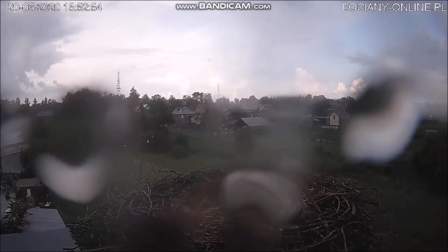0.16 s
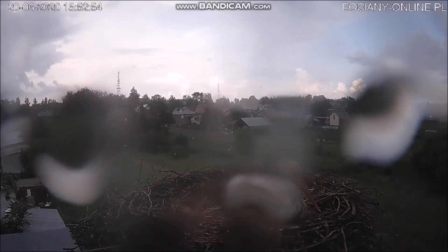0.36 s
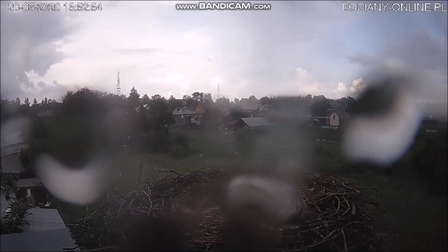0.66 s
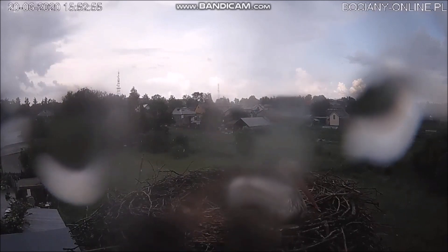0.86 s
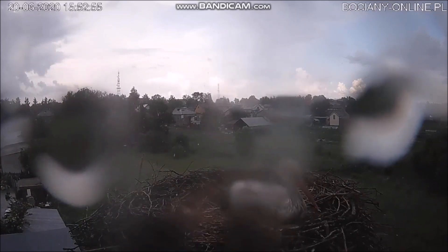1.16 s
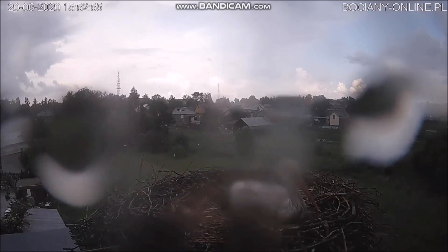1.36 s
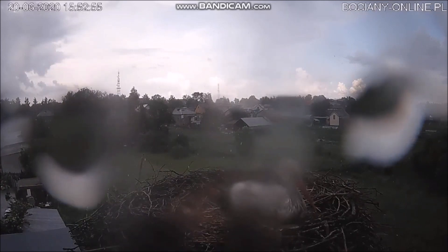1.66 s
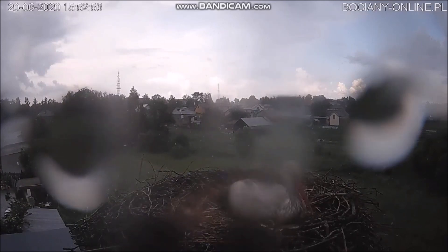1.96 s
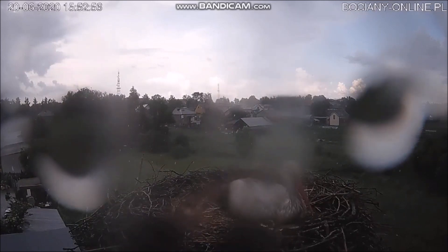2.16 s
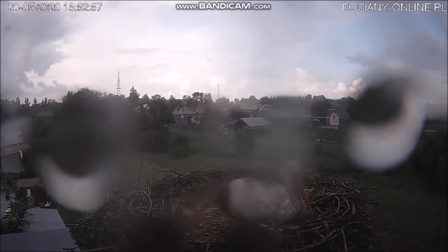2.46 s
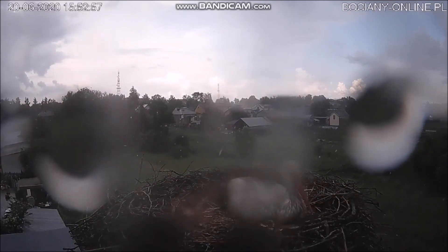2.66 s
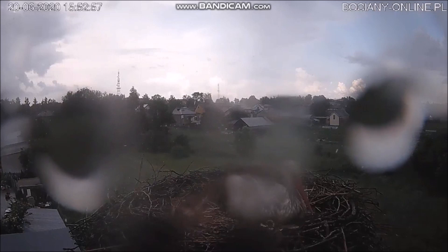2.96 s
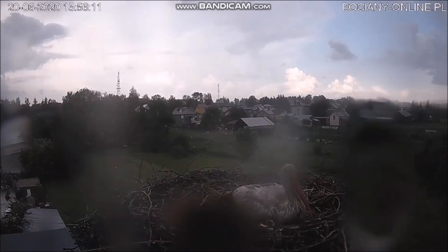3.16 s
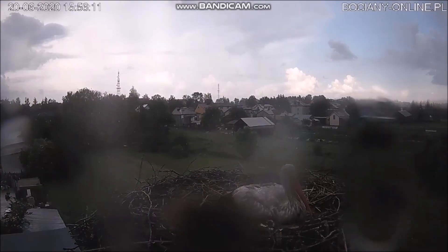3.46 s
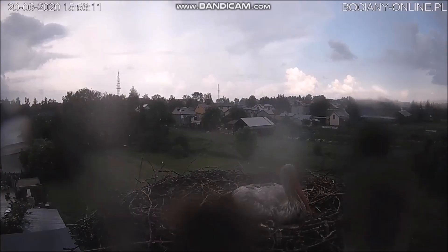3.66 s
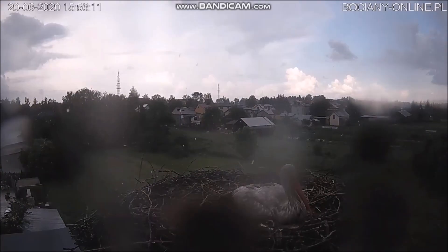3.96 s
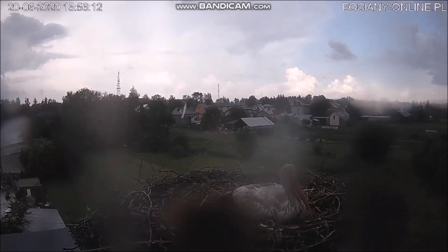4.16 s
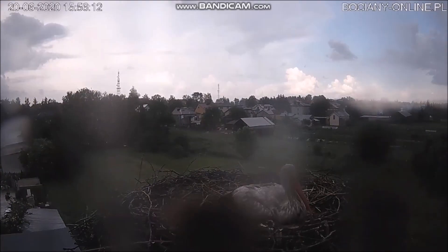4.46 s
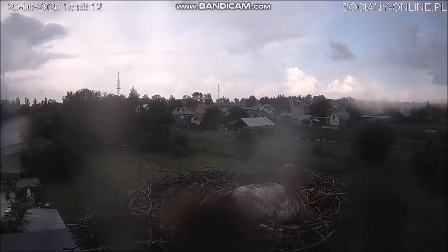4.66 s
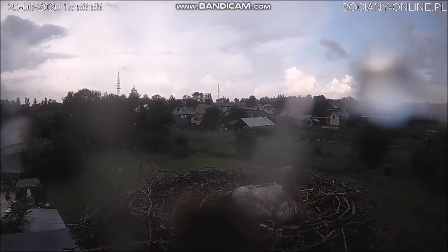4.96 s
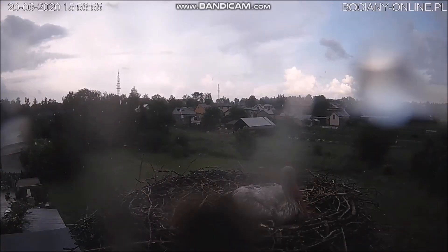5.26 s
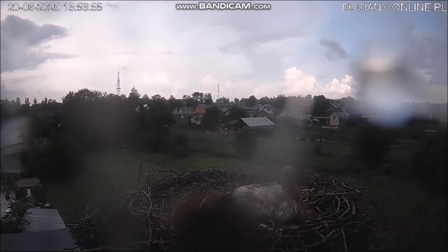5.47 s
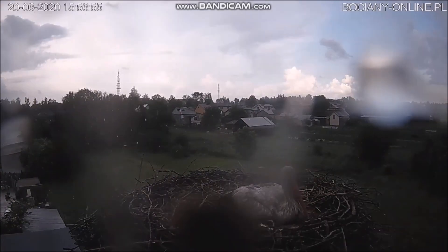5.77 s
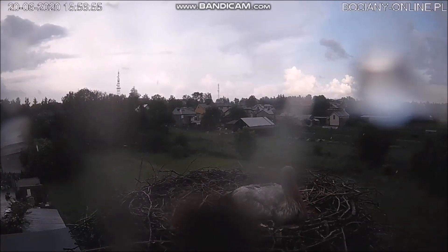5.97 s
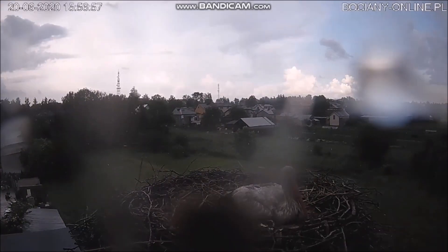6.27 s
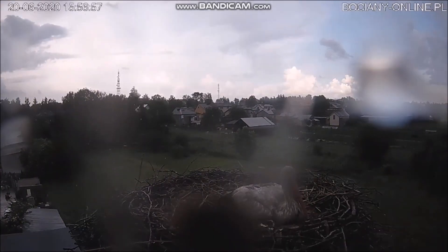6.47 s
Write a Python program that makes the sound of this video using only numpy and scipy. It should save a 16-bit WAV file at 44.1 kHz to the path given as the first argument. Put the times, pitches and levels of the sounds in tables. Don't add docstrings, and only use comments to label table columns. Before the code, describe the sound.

Outdoors at a stick nest, one mono microphone in a plastic housing catches dense bright rain, with near drops splashing, ticking and knocking. Muffled thunder rolls far off and fades. The sound drops to total silence for an instant, returns with softer rain, then cuts abruptly into a near thunder stroke: a rip, a violent crack, booming, crackling peals and late claps.

```python
import sys
import numpy as np
from scipy import signal
from scipy.fft import rfft, irfft
from scipy.io import wavfile
from scipy.ndimage import uniform_filter1d

SR = 44100
rng = np.random.default_rng(int(sys.argv[2]) if len(sys.argv) > 2 else 0)


def to_wav(s):
    ch = np.atleast_2d(s).T
    pcm = np.round(np.clip(ch, -1, 1) * 32767)
    wavfile.write(sys.argv[1], SR, pcm.astype(np.int16))


def invert_db(x):
    u = np.asarray(x, float) / 20
    return 10 ** u


N = 291501

GAP_S = (3.1335, 3.2002)
JUMP_S = 4.8665
RAIN_DB = (-43.2, -50.6, -48.3)


def unit(x):
    return x / np.sqrt(np.mean(x ** 2))


def colour(x, points, size=4096):
    hz, db = np.transpose(points)
    grid = np.maximum(np.arange(size // 2 + 1) * SR / size, 1)
    log_gain = np.interp(np.log(grid), np.log(hz), db) * np.log(10) / 20
    cepstrum = irfft(log_gain)
    cepstrum[1:size // 2] *= 2
    cepstrum[size // 2 + 1:] = 0
    impulse = irfft(np.exp(rfft(cepstrum)))
    return unit(signal.fftconvolve(x, impulse)[:N])


def walk(rate):
    hold = int(SR / rate)
    steps = np.repeat(rng.standard_normal(N // hold + 1), hold)
    return unit(uniform_filter1d(uniform_filter1d(steps, hold), hold)[:N])


def grains(rate, spread_db, smear_s, share):
    hit = rng.random(N) < rate / SR
    size = invert_db(spread_db * np.minimum(rng.exponential(size=N), 3.5))
    t = np.arange(int(0.05 * SR)) / SR
    energy = signal.fftconvolve(hit * size ** 2, np.exp(-2 * t / smear_s))[:N]
    energy = np.maximum(energy / energy.mean(), 0)
    return np.sqrt(1 - share + share * energy) * rng.standard_normal(N)


def add(out, s, sound):
    i = int(s * SR)
    out[i:i + len(sound)] += sound[:N - i]


def burst(x, lo_hz, hi_hz):
    y = signal.lfilter(*signal.butter(2, [lo_hz, hi_hz], "band", fs=SR), x)
    return y / np.abs(y).max()


def stretch(values):
    t = np.arange(N) / SR
    part = (t > GAP_S[1]) * 1 + (t >= JUMP_S)
    return np.array(values)[np.minimum(part, len(values) - 1)]


def swells(rows):
    t = np.arange(N) / SR
    power = sum(invert_db(db - 20 * np.maximum((s - t) / rise, (t - s) / fade)) ** 2 for s, db, rise, fade in rows)
    return 10 * np.log10(power + 1e-12)


def rain():
    # frequency in Hz, level in dB per Hz.
    heavy_colour = [(290, -31.5), (500, -15), (553, -15.5), (855, -10), (1440, 0.9), (2930, -4),
                    (3600, -0.5), (4470, -7), (5470, -6.7), (7100, -15), (8090, -11.5), (10100, -18),
                    (13400, -24.5), (15100, -32), (16000, -37.5)]
    # frequency in Hz, level in dB per Hz.
    light_colour = [(290, -21), (500, -23), (688, -21), (750, -18), (930, -6.5), (1110, -2), (1250, 1),
                    (1550, 0.3), (2570, -1), (3490, -1.5), (5470, -5.5), (7100, -14.5), (8090, -12.5),
                    (10000, -16), (11300, -20.5), (12700, -22), (16000, -30)]
    # peak time in seconds, dB against the steady rain,
    # seconds to rise 20 dB, seconds to fade 20 dB.
    gusts = [
        (0.0, -1, 0.1, 0.1),
        (0.5, -5, 0.4, 0.3),
        (1.0, -6, 0.5, 0.3),
        (1.75, -6, 0.6, 0.5),
        (4.0, -6, 0.5, 0.4),
        (4.6, -4, 0.6, 0.8),
    ]
    low = signal.butter(2, 4000, fs=SR, output="sos")
    high = signal.butter(2, 4000, "high", fs=SR, output="sos")
    dull = invert_db(0.5 * walk(9.03)) * grains(1600, 3.1, 0.002, 0.25)
    bright = invert_db(0.88 * walk(14)) * grains(600, 4.04, 0.0017, 0.273)
    patter = signal.sosfilt(low, dull) - signal.sosfilt(high, bright)
    heavy = np.arange(N) < GAP_S[1] * SR
    coloured = invert_db(4) * np.where(heavy, colour(patter, heavy_colour), colour(patter, light_colour))
    return coloured * invert_db(stretch(RAIN_DB)) * np.hypot(1, invert_db(swells(gusts)))


def contact(t60_s=0.0066):
    t = np.arange(int(0.03 * SR)) / SR
    attack = 1 - np.exp(-t / 0.00035)
    blow = rng.standard_normal(len(t)) * attack * np.exp(-np.log(1000) * t / t60_s)
    blow[4] += 1.8
    return blow


def splash(blow, db, ring_hz, edge_db):
    broad = burst(burst(blow, 2200, 7870), 2200, 7870)
    ring = burst(blow, 0.704 * ring_hz, 1.174 * ring_hz)
    edge = burst(blow, 8400, 14600)
    return invert_db(db) * (0.656 * broad + 0.663 * ring) - invert_db(edge_db) * edge


def drops():
    # start in seconds, splash peak in dB, ring in Hz, edge peak in dB.
    near_drops = [(0.0885, -28.5, 5230, -29.5), (0.1125, -25.5, 4900, -48), (0.2187, -26, 5860, -37.5),
                  (0.2288, -31, 6200, -34), (0.2321, -11, 6920, -17), (0.5646, -30, 5540, -28),
                  (0.5683, -21, 3300, -28), (0.7893, -34, 4820, -38), (0.8343, -33, 3790, -49),
                  (0.845, -28.5, 5170, -45), (0.961, -32.5, 5510, -35.5), (1.1365, -35, 4480, -37),
                  (1.2076, -32, 5510, -40), (1.297, -24.5, 6550, -36.5), (1.6035, -29, 4480, -51),
                  (2.438, -24, 4130, -43), (2.5199, -32.5, 4820, -37), (2.7697, -20, 4210, -24.5),
                  (2.924, -25.5, 4560, -25), (3.0822, -28.5, 6200, -39.5), (3.332, -28.5, 4430, -51),
                  (3.8313, -36, 4820, -51), (4.595, -34, 5170, -49), (4.687, -37, 6500, -44),
                  (5.6098, -34.5, 4100, -41), (5.8961, -27, 8600, -51.5), (5.9756, -29.5, 4900, -46),
                  (6.1888, -30, 4900, -35), (6.3457, -31, 5660, -55), (6.4563, -29.5, 8500, -55)]
    # start in seconds, edge peak in dB.
    spray = [(0.496, -38.5), (0.6843, -41.5), (1.3658, -39), (2.295, -35), (3.4943, -40.5), (4.23, -47),
             (4.7992, -47), (5.0334, -38.5), (5.6671, -37.5), (6.0391, -44.5), (6.2959, -44.5)]
    out = np.zeros(N)
    for s, db, hz, edge_db in near_drops:
        add(out, s, splash(contact(), db, hz, edge_db))
    for s, edge_db in spray:
        add(out, s, splash(contact(), edge_db - 4.5, 6000, edge_db))
    return out


def thuds():
    # start in seconds, peak in dB, pitch in Hz.
    knocks = [(0.2325, -19.5, 1900), (0.566, -27, 1600), (0.5691, -23, 2100), (1.293, -30, 1550),
              (1.297, -31.5, 1550), (2.438, -37, 1550), (2.7697, -24, 2300), (2.7724, -22, 1600),
              (2.9208, -24, 3300), (2.9235, -22, 1600), (0.938, -30, 2200), (0.992, -28, 3500),
              (1.03, -32, 4200), (2.359, -30, 3700), (3.108, -31, 4500), (4.15, -38, 6000),
              (4.545, -42, 8500), (4.6155, -34, 5200), (4.69, -38, 6000), (4.7205, -33, 3500),
              (4.752, -42, 8000), (6.1888, -17.5, 4500), (2.9245, -31, 800), (0.153, -32, 900),
              (1.72, -30, 3600), (1.8, -30, 3500), (1.86, -31, 3700)]
    out = np.zeros(N)
    for s, db, hz in knocks:
        body = burst(burst(contact(), 0.7 * hz, 1.4 * hz), 0.7 * hz, 1.4 * hz)
        add(out, s, -invert_db(db) * body)
    return out


def ticks(count=160):
    out, t, rain_db = np.zeros(N), np.arange(int(0.01 * SR)) / SR, stretch(RAIN_DB)
    for when, pitch, size in rng.random((count, 3)):
        hz = 2500 * 4.2 ** pitch
        ring = np.sin(2 * np.pi * hz * t) * np.exp(-t * hz / 5.2)
        db = rain_db[int(when * (N - 1))] + 2 + 10.94 * size - 7 * pitch
        add(out, when * (N - 1) / SR, invert_db(db) * ring)
    return out


def bubbles():
    # start in seconds, peak in dB, first pitch in Hz, last pitch in Hz, length in seconds.
    cavities = [
        (0.155, -37.5, 900, 2050, 0.018),
        (0.232, -35, 950, 1300, 0.012),
        (1.66, -42, 3500, 3350, 0.01),
        (1.692, -42, 3300, 3400, 0.01),
        (1.727, -39, 3450, 3350, 0.016),
        (1.772, -41, 3600, 3400, 0.02),
        (1.862, -39, 3300, 3600, 0.022),
        (4.687, -42, 4800, 5200, 0.01),
    ]
    out = np.zeros(N)
    for s, db, from_hz, to_hz, length in cavities:
        u = np.arange(int(length * SR)) / (length * SR)
        phase = 2 * np.pi * np.cumsum(from_hz + (to_hz - from_hz) * u) / SR
        add(out, s, invert_db(db) * np.sin(np.pi * u ** 0.7) * np.sin(phase))
    return out


def stroke(axis):
    # start in seconds, crackle in dB, boom in dB, seconds to fade 20 dB.
    claps = [
        (4.867, -32.5, -38, 0.28),
        (5.064, -21.5, -24, 0.075),
        (5.131, -23.5, -28.5, 0.14),
        (5.147, -23.5, -25, 0.115),
        (5.55, -52, -42, 0.05),
        (6.056, -35, -44, 0.07),
        (6.197, -35, -38.5, 0.13),
        (6.269, -31.5, -41, 0.07),
        (6.587, -33.5, -38, 0.2),
    ]
    # peak time in seconds, crackle in dB, boom in dB,
    # seconds per 20 dB.
    peals = [
        (5.035, -30.5, -40, 0.13),
        (5.34, -34.5, -37, 0.25),
        (5.655, -34, -46, 0.24),
        (5.6, -36, -50, 0.07),
        (5.69, -36, -48, 0.05),
        (5.78, -46, -44, 0.1),
        (5.895, -39, -52, 0.05),
        (5.968, -36, -44.5, 0.11),
        (6.54, -42, -46, 0.2),
    ]
    # peak time in seconds, crackle in dB, boom in dB, seconds to fade 20 dB.
    echo_tail = (5.1, -36, -44, 3.7)
    arrivals = [(row[0], row[axis], 0.0042, row[3]) for row in claps]
    arrivals += [(echo_tail[0], echo_tail[axis], 0.25, echo_tail[3])]
    arrivals += [(row[0], row[axis], row[3], row[3]) for row in peals]
    return swells(arrivals)


def cracks():
    # start in seconds, peak in dB.
    crack_edges = [
        (5.0632, -16),
        (5.0715, -30.5),
        (5.0793, -24),
        (5.131, -26),
        (5.1372, -22.5),
        (5.1393, -19.5),
        (5.1426, -32),
        (5.1504, -17.5),
        (5.159, -23.5),
        (5.1753, -31.5),
    ]
    out = np.zeros(N)
    for s, db in crack_edges:
        add(out, s, splash(contact(t60_s=0.0095), db, 2800, db - 12))
    return out


def shocks():
    # start in seconds, peak in dB, length in ms.
    far_fronts = [(0.1502, -24, 2.95), (0.1864, -27, 3.07), (0.2274, -35, 3.59), (0.3304, -37, 2.36),
                  (0.3881, -36, 2.95), (0.4171, -38, 2.88), (0.4331, -36, 2.72), (0.4957, -37, 2.75),
                  (0.5654, -32, 2.22), (0.7347, -40, 2.73), (1.3429, -34, 3.16), (1.3652, -36, 3.45),
                  (1.407, -36, 2.47), (1.4863, -35, 2.74), (1.4993, -34, 2.05), (1.5404, -34, 2.46),
                  (1.605, -33, 2.46), (1.618, -24, 2.34), (1.6387, -31, 2.52), (1.6549, -30, 2.56),
                  (1.6692, -34, 3.29), (1.6951, -34, 3.3), (1.855, -36, 1.96), (1.9104, -35, 3.13),
                  (2.1556, -39, 2.63), (2.3465, -40, 2.33), (2.7712, -40, 1.95), (2.9219, -32, 1.84),
                  (3.2001, -44, 2.84), (3.3871, -41, 3.23), (4.0468, -38, 2.73), (4.2642, -39, 3.31),
                  (4.4312, -37, 3.46), (4.5058, -39, 3.03), (4.6199, -37, 2.82), (4.6697, -38, 2.75)]
    # start in seconds, peak in dB, length in ms.
    dull_fronts = [(4.8672, -28, 2.52), (4.8831, -27, 2.92), (4.9004, -29, 2.51), (4.9139, -30, 2.11),
                   (4.9578, -29, 2.21), (5.0163, -27, 3.67), (5.0649, -13, 2.47), (5.0765, -16, 2.51),
                   (5.0889, -23, 3.38), (5.1024, -23, 2.68), (5.1355, -19, 2.52), (5.1558, -15, 2.29),
                   (5.1697, -19, 2.15), (5.1808, -22, 2.85), (5.1922, -24, 2.34), (5.2288, -27, 2.45),
                   (5.2424, -25, 2.48), (5.2802, -27, 2.43), (5.2972, -27, 3.58), (5.3302, -22, 3.3),
                   (5.3416, -26, 2.61), (5.3649, -25, 2.54), (5.3945, -27, 2.57), (5.4472, -29, 2.04),
                   (5.4699, -30, 2.04), (5.5537, -25, 2.36), (5.637, -29, 2.8), (5.6601, -30, 2.36),
                   (5.6786, -27, 2.64), (5.69, -29, 2.69), (5.7559, -31, 3.16), (5.7898, -30, 2.66),
                   (5.8722, -32, 3.09), (5.9627, -28, 2.48), (5.9931, -32, 3.04), (6.0466, -31, 2.62),
                   (6.0765, -28, 2.46), (6.1089, -32, 2.26), (6.1397, -32, 2.74), (6.1928, -25, 2.43),
                   (6.2421, -25, 2.4), (6.2671, -20, 2.4), (6.303, -27, 2.98), (6.5927, -24, 2.78)]
    # start in seconds, peak in dB, length in ms.
    snaps = [(4.8723, -18, 0.65), (4.8807, -26, 0.52), (4.8896, -22, 0.66), (4.9034, -24, 0.69),
             (4.9133, -23, 0.56), (4.946, -22, 0.63), (5.0034, -22, 0.65), (5.017, -20, 0.65),
             (5.0274, -21, 0.67), (5.0648, -14, 0.75), (5.0728, -16, 0.7), (5.0814, -15, 0.73),
             (5.089, -18, 0.59), (5.1002, -18, 0.75), (5.1136, -18, 0.64), (5.1308, -15, 0.63),
             (5.1383, -15, 0.61), (5.1455, -14, 0.76), (5.1578, -16, 0.72), (5.1637, -17, 0.74),
             (5.1739, -15, 0.72), (5.181, -20, 0.66), (5.1871, -17, 0.71), (5.205, -20, 0.61),
             (5.2223, -21, 0.7), (5.23, -20, 0.65), (5.2488, -21, 0.75), (5.3047, -22, 0.61),
             (5.3137, -23, 0.62), (5.332, -21, 0.63), (5.3382, -20, 0.69), (5.354, -22, 0.7),
             (5.3616, -23, 0.76), (5.3729, -21, 0.72), (5.466, -21, 0.59), (5.4998, -25, 0.57),
             (5.5066, -24, 0.63), (5.5882, -23, 0.71), (5.6, -23, 0.67), (5.6285, -20, 0.7),
             (5.64, -18, 0.72), (5.6606, -21, 0.77), (5.6845, -21, 0.66), (5.6909, -21, 0.65),
             (5.758, -23, 0.67), (5.7754, -26, 0.61), (5.8944, -23, 0.65), (5.966, -22, 0.63),
             (5.9752, -23, 0.68), (6.018, -25, 0.68), (6.0556, -18, 0.71), (6.1034, -26, 0.68),
             (6.1969, -21, 0.7), (6.2754, -18, 0.7), (6.4613, -27, 0.6), (6.5575, -26, 0.65),
             (6.5861, -24, 0.75), (6.5949, -20, 0.73)]
    out, t = np.zeros(N), np.arange(int(0.06 * SR)) / SR
    for s, db, ms in far_fronts + dull_fronts + snaps:
        front = np.clip(2000 * t / ms - 1, -1, 1) * (t < ms / 1000)
        t60 = 0.012 + 0.0105 * ms
        echoes = 0.05 * rng.standard_normal(len(t)) * np.exp(-np.log(1000) * t / t60)
        echoes[0] = 1
        wave = np.convolve(front[:400], echoes)[:len(t)]
        wave = burst(burst(wave, 560 / ms, 1900 / ms), 500 / ms, 1500 / ms)
        add(out, s + 0.001 - 0.0004 * ms, -invert_db(db - 5) * wave)
    return out


def thunder():
    # frequency in Hz, level in dB per Hz.
    roll_colour = [(24, -78.5), (40, -48), (76, -31), (124, -7.5), (209, 1), (301, 0), (357, 1),
                   (391, -3.5), (514, -1.5), (703, -6), (900, -11.5), (1170, -39), (1980, -120)]
    boom_colour = [(24, -91), (40, -65), (75, -27), (120, -11), (177, -3.5), (348, -0.5), (385, 0),
                   (423, -3), (500, -2), (625, -6), (760, -4), (900, -10.5), (1170, -30), (1980, -120)]
    tear_colour = [(290, -35), (500, -7), (630, -11), (764, -8.5), (900, -5.5), (1030, -1), (1250, -1.7),
                   (1390, -0.5), (1500, 1), (1620, -2.5), (1900, -5), (2310, -9), (2970, -17),
                   (5000, -45.5), (6500, -42.5), (11000, -120)]
    # frequency in Hz, level in dB per Hz.
    fresh_colour = [(600, -70), (1200, -30), (1900, -4), (2500, 0), (3000, -3), (3800, -22), (7000, -80)]
    # peak time in seconds, level in dB, seconds to rise 20 dB, seconds to fade 20 dB.
    fresh_rip = [
        (4.93, -40, 0.4, 0.15),
        (5.01, -41, 0.05, 0.12),
        (5.14, -32, 0.04, 0.1),
    ]
    far_bed_db = (-60, -56.5)
    # peak time in seconds, level in dB, seconds to rise 20 dB,
    # seconds to fade 20 dB.
    far_swells = [
        (0.2, -47.5, 0.4, 0.75),
        (0.0, -49, 0.1, 0.1),
        (1.35, -50, 0.3, 0.4),
        (1.52, -49.5, 0.4, 0.9),
        (1.63, -44, 0.11, 0.53),
        (1.95, -51, 0.2, 1.2),
        (3.95, -56, 0.3, 0.3),
        (4.25, -56, 0.2, 0.2),
        (4.65, -51.5, 0.6, 0.38),
    ]
    near = np.arange(N) >= JUMP_S * SR
    fronts = grains(230, 4, 0.028, 0.15)
    far_level = np.hypot(invert_db(swells(far_swells)), invert_db(stretch(far_bed_db)))
    far_roll = colour(fronts, roll_colour) * far_level
    boom = colour(fronts, boom_colour) * invert_db(stroke(axis=2))
    roll = np.where(near, boom, far_roll) * invert_db(0.4)
    tear_db = stroke(axis=1)
    crackle = grains(300, 4.2, 0.003, 0.2)
    tear = colour(crackle, tear_colour) * invert_db(tear_db - 2.2)
    tear = tear + colour(crackle, fresh_colour) * invert_db(swells(fresh_rip))
    sizzle = colour(crackle, [(1500, -24), (3000, -3), (8000, -6.5), (15000, -15)])
    sizzle = sizzle * invert_db(2.88 * (tear_db + 25) - 45.5)
    return roll + near * (tear + sizzle) + cracks() + shocks()


def housing(x):
    # centre in Hz, width in Hz, gain in dB.
    resonances = [
        (385, 60, 1.2),
        (1120, 110, 3),
        (1510, 140, 1.5),
        (1950, 400, -1.4),
        (2350, 500, 1.8),
        (3050, 250, -2.3),
        (3480, 400, 1.3),
    ]
    for hz, width_hz, db in resonances:
        x = x + (invert_db(db) - 1) * signal.lfilter(*signal.iirpeak(hz, hz / width_hz, fs=SR), x)
    return x


def scene():
    return np.tile(rain() + drops() + thuds() + ticks() + bubbles() + thunder(), (2, 1))


def roll_off(x):
    return signal.sosfilt(signal.butter(12, 16660, fs=SR, output="sos"), x)


def record(dry):
    t = np.arange(N) / SR
    x = signal.sosfilt(signal.butter(2, 90, "high", fs=SR, output="sos"), housing(dry))
    x = 0.33 * np.tanh(x / 0.33)
    x = x * ((t < GAP_S[0]) | (t > GAP_S[1]))
    x = signal.sosfilt(signal.ellip(10, 0.3, 45, 15650, fs=SR, output="sos"), x)
    return roll_off(x)


dry = scene()
out = record(dry)
to_wav(out)
```